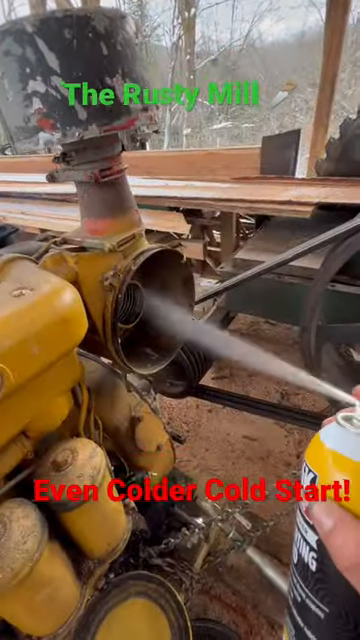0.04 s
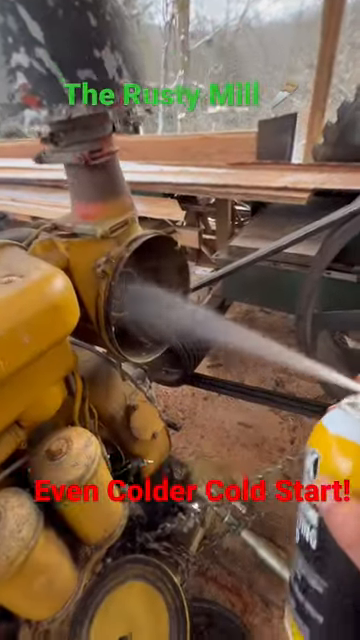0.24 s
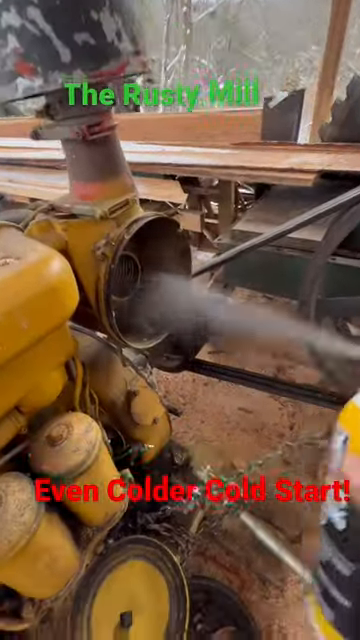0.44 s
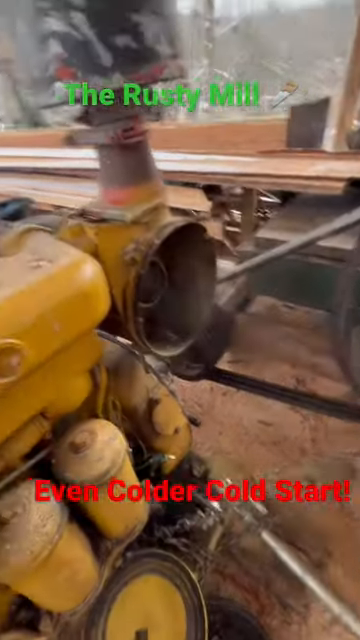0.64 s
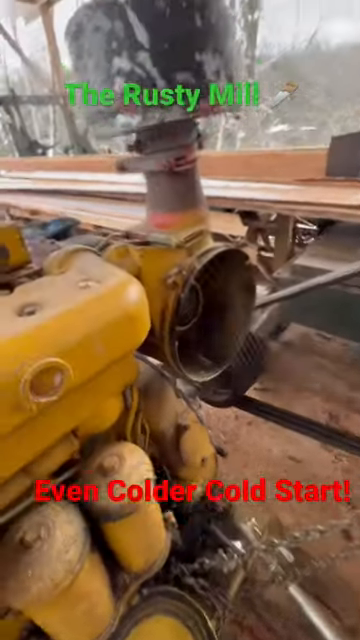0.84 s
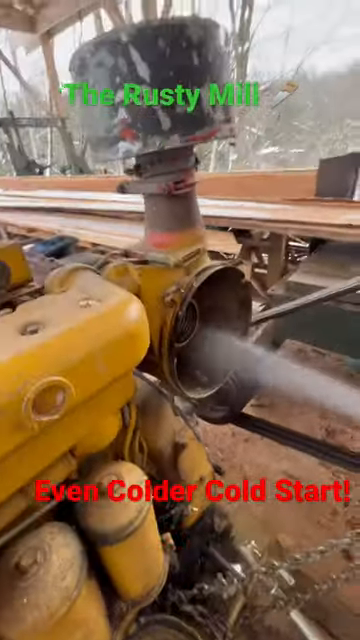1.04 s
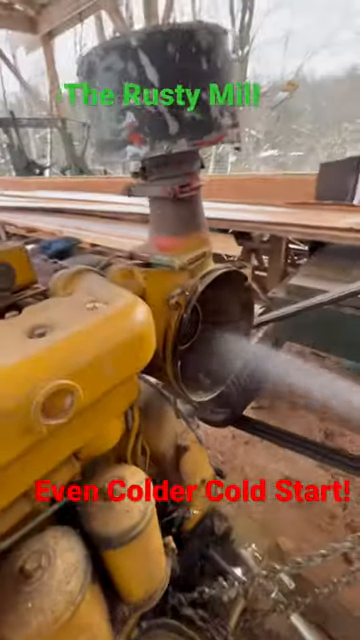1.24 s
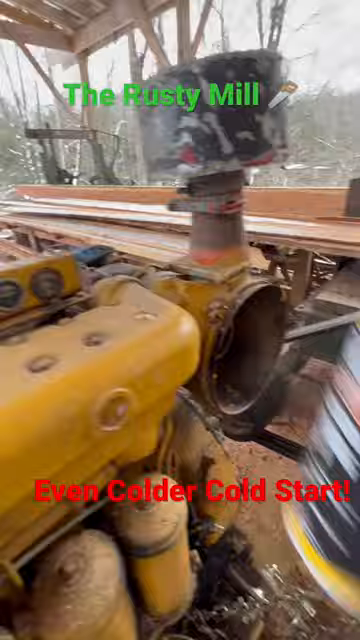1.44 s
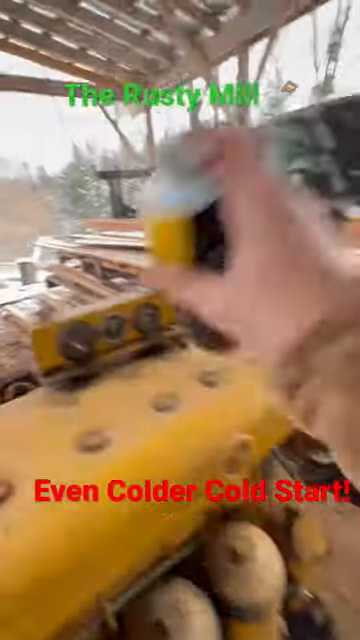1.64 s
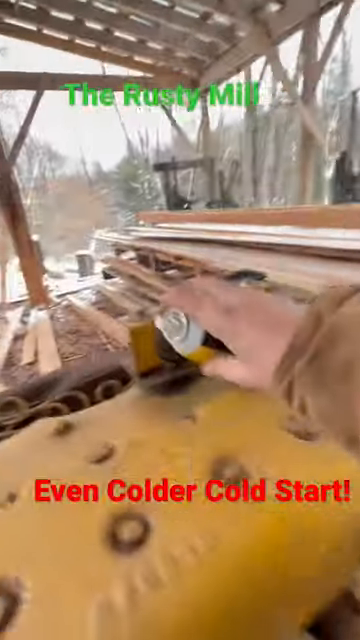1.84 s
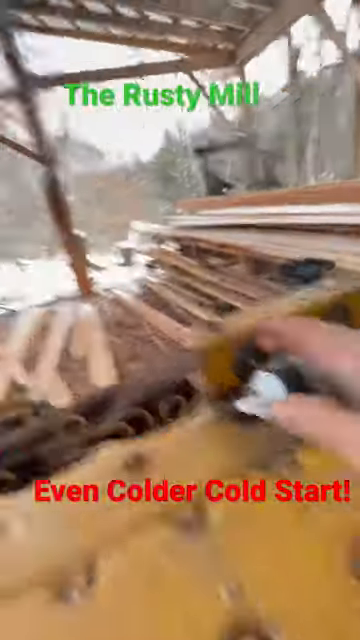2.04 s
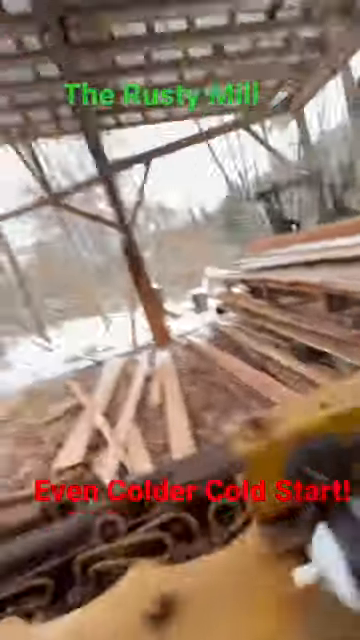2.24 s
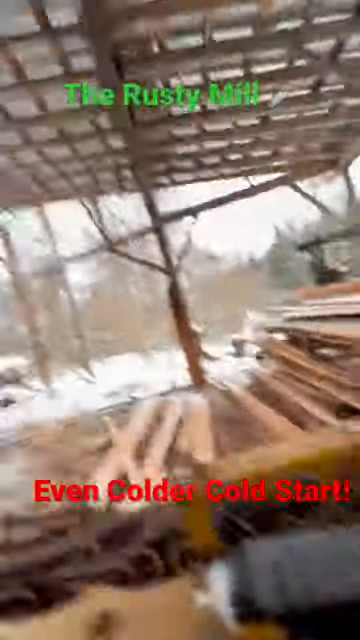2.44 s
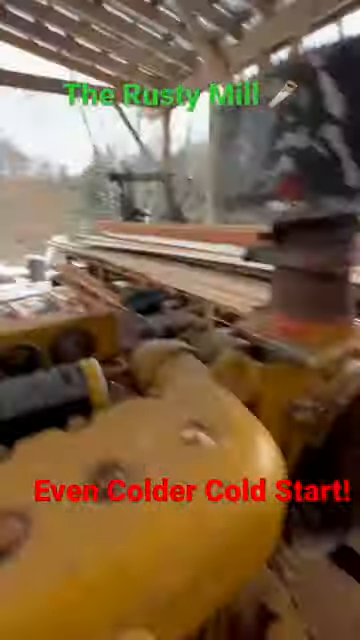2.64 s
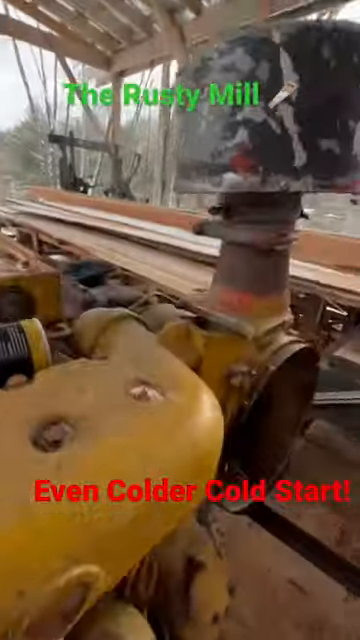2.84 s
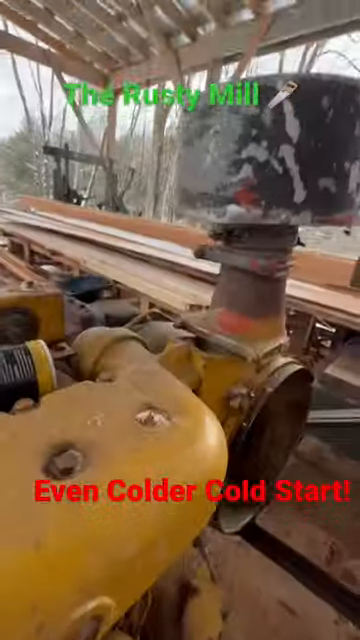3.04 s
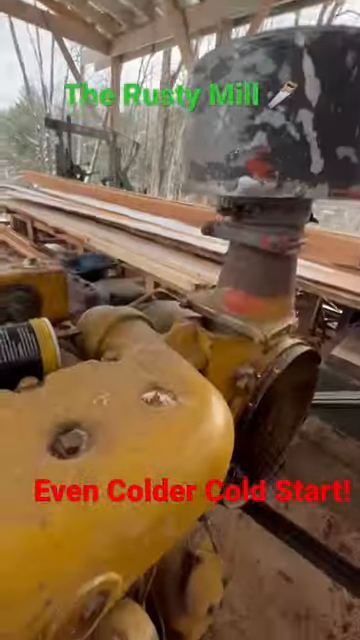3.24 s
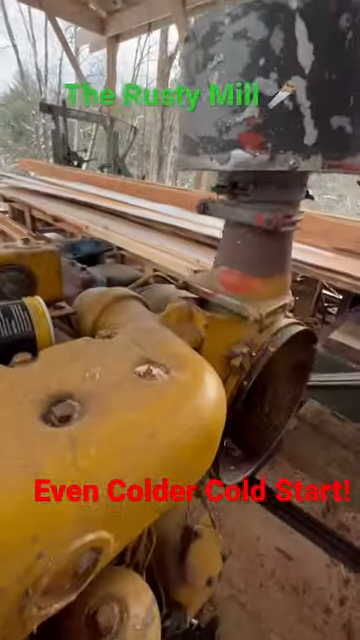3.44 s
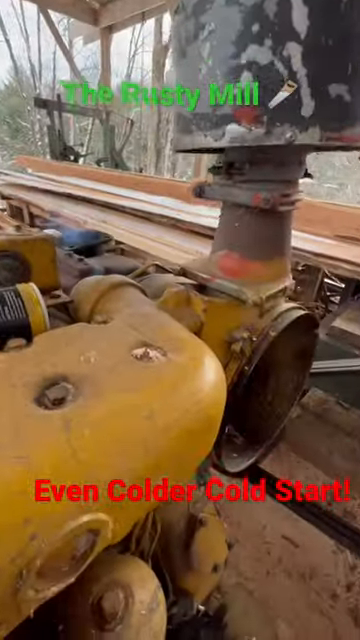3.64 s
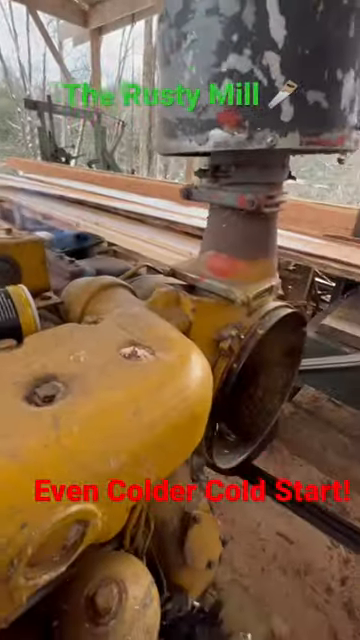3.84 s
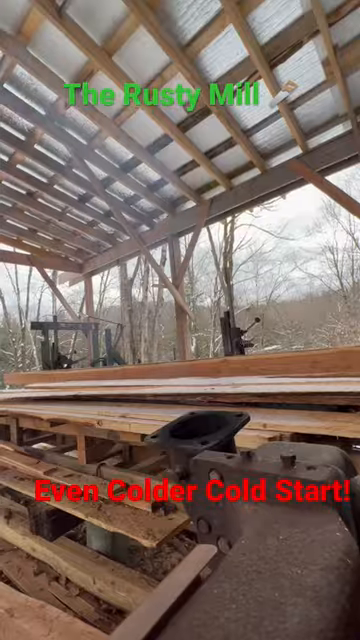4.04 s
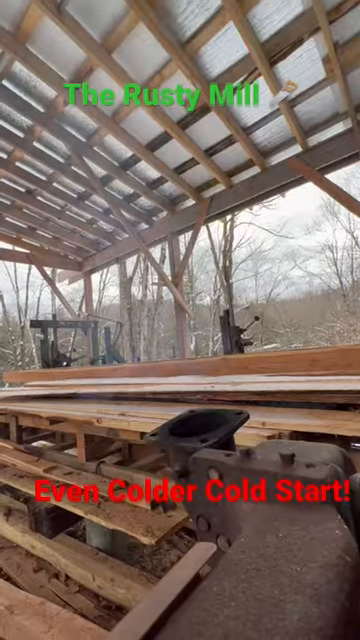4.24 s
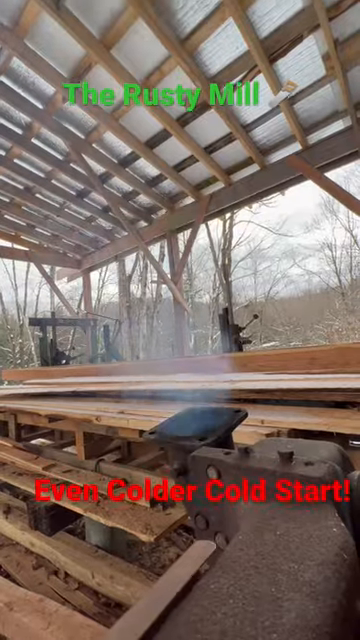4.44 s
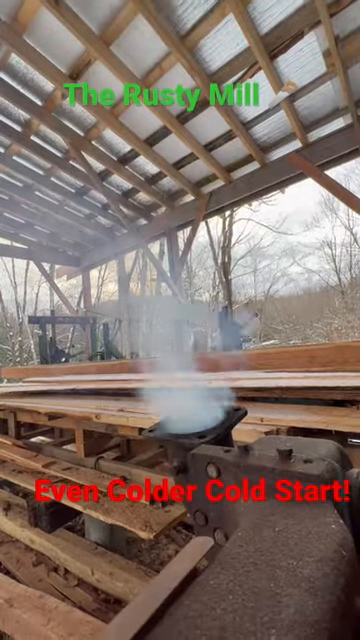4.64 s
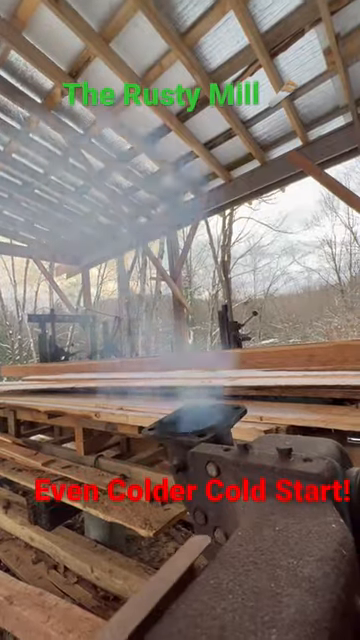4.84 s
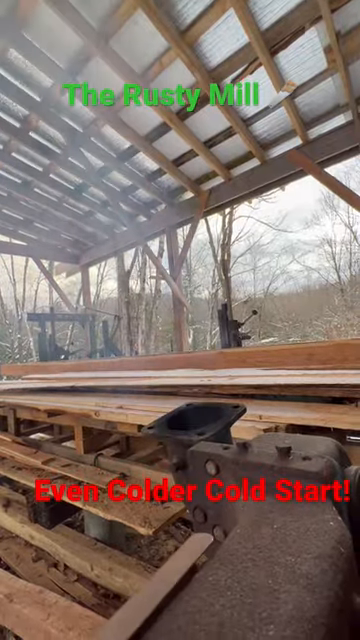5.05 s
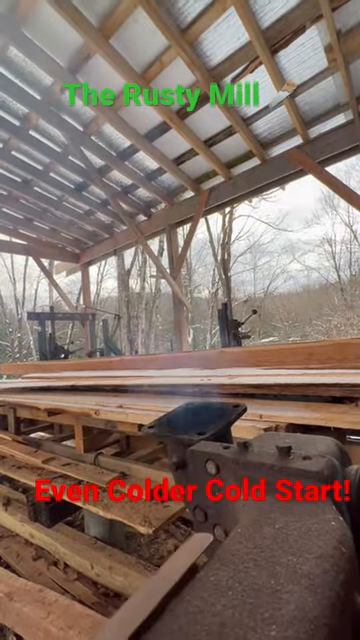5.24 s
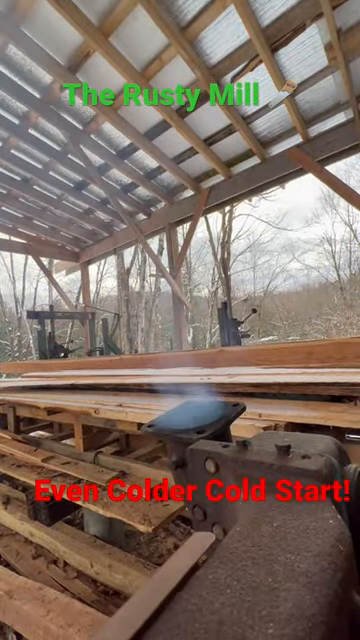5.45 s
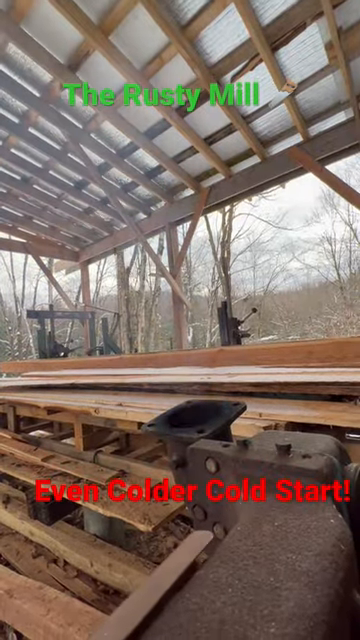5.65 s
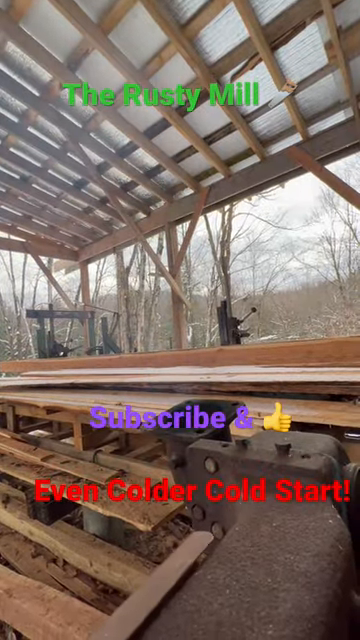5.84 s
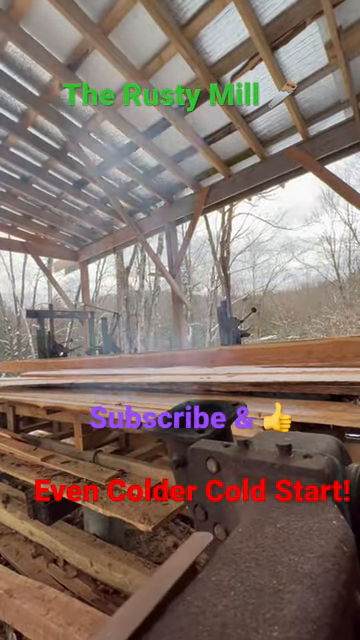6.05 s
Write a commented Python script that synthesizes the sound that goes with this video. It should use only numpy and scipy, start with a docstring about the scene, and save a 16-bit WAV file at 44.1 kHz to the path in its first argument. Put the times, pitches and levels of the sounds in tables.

```python
"""An open timber shed in the cold: an aerosol can hisses twice, drops on the engine cover and bounces.
The starter grinds on the flywheel, then a six-cylinder diesel chugs unevenly, one cylinder missing.
Jet, rustle and roar are shaped noise; the can and the metal parts are ringing modes; gas leaves in noisy puffs.
A phone with two microphone ports is held close by."""
import sys
import numpy as np
from scipy import signal
from scipy.fft import rfft, irfft, next_fast_len
from scipy.io import wavfile
from scipy.ndimage import map_coordinates

SR = 44100
rng = np.random.default_rng(int(sys.argv[2]) if len(sys.argv) > 2 else 0)


def wav_record(signal):
    """Record a signal, one row per channel, as 16-bit PCM in the file named by sys.argv[1]."""
    frames = np.transpose(np.atleast_2d(signal))
    bounded = np.clip(frames, -1, 1)
    # unit amplitude maps onto the largest positive 16-bit level
    quanta = np.round(bounded * 32767).astype(np.int16)
    wavfile.write(sys.argv[1], SR, quanta)


N = 269010
T = np.arange(N) / SR  # seconds

# In every colour table density_db is the relative level per Hz; noise() sets the overall level.
# Presses of the nozzle: start_s, stop_s, jet_db
NOZZLE_PRESSES = [(-.1, 0.403, -34.5), (0.799, 1.231, -35)]
# Colour of the spray jet: freq_hz, density_db
JET_COLOUR = [(290, -64), (500, -17.5), (621, -19), (893, -14.5), (1000, -9), (1080, -13), (2190, -7.5),
              (4870, -5.5), (5160, -2.5), (5710, -3.5), (7100, -1.5), (13800, -12), (16000, -16.5)]
OPEN_S, CLOSE_S = 0.0093, 0.0073  # the nozzle valve opening and closing
DRIBBLE_S, DRIBBLE_DB = .06, -17.5  # weak dribble after release, level against the jet

# Low stir of air: time_s, level_db
AIR_LEVEL = [(0.0, -54.5), (0.6, -63), (0.86, -60.5), (1.32, -55), (1.66, -60), (1.82, -52.5), (2.27, -49),
             (2.39, -46.5), (2.67, -54.5), (2.78, -62.5), (3.01, -63.5), (3.36, -60), (3.44, -70.5)]
# Colour of that stir: freq_hz, density_db
STIR_COLOUR = [(15, -39), (25, 8.5), (136, -1), (163, -6), (248, -4), (494, -14), (900, -24.5),
               (1170, -41.5), (1980, -120)]
# Colour of the far hiss: freq_hz, density_db
HISS_COLOUR = [(290, -51), (500, -10.5), (652, -8), (707, -8), (1070, -5), (1470, -7.5), (1870, -1.5),
               (2850, -18.5), (5190, -16), (12000, -28.5), (15600, -68.5), (22000, -120)]
# Sleeve, and the can scraping as it rolls: time_s, level_db
RUSTLE_LEVEL = [(.43, -69), (.55, -71), (.63, -66), (.69, -74), (.72, -110), (1.22, -62), (1.42, -67),
                (1.48, -58.5), (1.56, -67.5), (1.7, -68.5), (1.8, -54.5), (1.94, -43.5), (2.1, -41.5),
                (2.26, -45), (2.3, -38.5), (2.38, -51), (2.393, -62.5), (2.9, -71.5)]
# Colour of cloth and scrape: freq_hz, density_db
CLOTH_COLOUR = [(150, -59), (400, -9), (800, -6), (1570, -4), (2200, -11.5), (2800, -12.5), (8570, -19),
                (11000, -40.5), (15000, -60.5)]
# Soft bumps on the cover: start_s, level_db, pitch_hz (once settled), t60_s
SOFT_BUMPS = [(1.228, -53, 70, 0.15), (1.441, -41, 69, 0.14), (2.165, -23, 70, 0.18),
              (2.275, -22.5, 70, 0.084), (2.297, -20.5, 59.6, 0.2), (2.528, -36.5, 50.6, 0.23)]

# The can meets the cover: start_s, crack_db, clang_db, hum_db, ring_db, thud_db, wall_snap_hz
BOUNCES = [(1.7676, -11, -6.5, -50, -38, -39, 3040), (1.8658, -11.5, -2.5, -50.5, -31.5, -31.5, 2800),
           (1.8996, -17, -8.5, -37.5, -37, -47.5, 3220), (1.955, -9, -9, -23, -15.5, -21.5, 3380),
           (2.0484, -13, -3.5, -26, -29, -45.5, 4350), (2.0905, -22, -15.5, -33.5, -30, -36.5, 4400),
           (2.1055, -10, -6.5, -27, -22.5, -39, 4300), (2.1385, -29, -16, -21.5, -32.5, -30, 3380),
           (2.1605, -39.5, -21.5, -19.5, -40, -27.5, 3400), (2.1796, -21, -14, -39, -22.5, -25, 3360),
           (2.2424, -25, -16, -46, -33, -27.5, 3600), (2.2846, -27, -24, -51, -45, -27.5, 3360),
           (2.3098, -45.5, -19, -46, -53, -30, 3400)]
# Modes of the can, humming one first: pitch_hz, level_db, t60_s (before the cover damps the others)
CAN_MODES = [(785, 2.5, .8), (956, -6.5, 0.33), (1195, -6.5, 0.14), (1270, -19.5, 0.23), (1490, -8, 0.22),
             (1744, -13.5, 0.48), (2430, -12.5, 0.19), (2660, -17.5, 0.16), (3400, -16.5, 0.12),
             (3970, -7, 0.07), (4600, -13.5, 0.07), (4829, -31.5, .08), (6400, -15, 0.053)]
# Colour of the contact crack: freq_hz, density_db
CRACK_COLOUR = [(1060, -27.5), (1800, -5.5), (3030, -4), (3610, -23.5), (4790, -1.5), (5490, -9),
                (6130, -6), (8130, -7.5), (9080, -9.5), (16000, -40)]
# Colour of the clang: freq_hz, density_db
CLANG_COLOUR = [(240, -60.5), (400, -42.5), (629, 4), (791, 4), (1440, -1), (2060, -29), (2500, -27),
                (3250, -53.5), (5500, -120)]
SNAP_DB, CRACK_TAIL_DB = -4, -26  # against the crack
SHELL_T60 = 0.95  # s, extra damping of the shell on the cover
SLIDE_START_S, SLIDE_STOP_S = 2.29, 2.392  # the rim slides ever faster
SQUEAK_FROM_HZ, SQUEAK_TO_HZ, SQUEAK_END_DB = 1200, 2000, -37  # nominal glide and final level

# Starter, tones against the grind: time_s, tooth_rate_hz, grind_db, tooth_tone_db, octave_db
STARTER = [(3.425, 150, -65, -10, -15), (3.455, 160, -26, -20, -25), (3.485, 180, -10, -5, -25),
           (3.52, 170, -18, -14, -18), (3.555, 171, -15, 3, -22), (3.6, 225, -16, -16, -12),
           (3.66, 293, -12, -2, -25), (3.695, 286, -16, 0, -20), (3.725, 200, -13, -14, -25),
           (3.755, 194, -17, 6, -8), (3.78, 270, -14, -22, -18), (3.8, 308, -15, -12, 6),
           (3.825, 331, -15, -7, 2), (3.87, 299, -14, -11, -3), (3.9, 262, -19, -2, -12),
           (3.935, 352, -17, -25, 0), (3.955, 350, -18, -14, -2), (3.972, 312, -18, -5, 7),
           (3.99, 308, -15, -4, 4)]
# Resonances of the flywheel housing: freq_hz, width_hz, level_db
HOUSING_MODES = [(286, 85, -10), (603, 43.4, 1.5), (861, 32.4, 3), (1154, 20, -6), (1306, 29, -4.5),
                 (2050, 99, -17.5), (2160, 27, -36), (2560, 55, -14), (3000, 57, -19)]
# Colour of the loose grinding: freq_hz, density_db
GRIND_COLOUR = [(24, -64), (40, -16), (285, -4), (464, -16), (614, -9), (877, -11), (1040, -20),
                (1300, -19), (2590, -29.5), (3500, -31), (4550, -37), (7700, -120)]
# Colour of the motor whine and screech: freq_hz, density_db
WHINE_COLOUR = [(1470, -13), (2500, -9), (3010, -12), (3520, -21.5), (4910, -16.5), (5440, -10),
                (5870, -19), (7530, -16), (12100, -41), (12400, -34), (14700, -43), (15600, -47),
                (16000, -64.5)]
WHINE_DB, ENGAGE_S, SCREECH_DB = -32, 3.462, -7  # the pinion engages with a short screech
RELEASE_S = 3.995  # the starter stops

FIRST_S, CYCLE_S = 3.96, .2675  # first missed firing, length of one engine cycle
# Roar between firings: freq_hz, density_db
ROAR_COLOUR = [(15, -36), (25, -31), (64, 6), (190, -5.5), (326, 1), (451, -4.5), (714, -3.5), (796, -8),
               (1160, -9.5), (1290, 1.5), (1480, -19), (2410, -15.5), (3520, -26.5), (8360, -27),
               (16000, -76.5)]
# Exhaust thumps: share_of_cycle, level_db (before a random spread)
CYLINDERS = [(.19, -17.5), (0.35, -18.5), (.5, -25.5), (.66, -20), (0.842, -12.5)]
# Exhaust puffs: time_s, hiss_db, block_ring_db, bark_db, hiss_t60_s
PUFFS = [(4.0167, -12.5, -32, -23, 0.045), (4.0283, -15.5, -22, -31, 0.056),
         (4.0913, -16, -29, -20.5, 0.053), (4.13, -31, -25.5, -27, 0.045), (4.1444, -12, -26.5, -29, 0.041),
         (4.159, -16, -31, -27, 0.042), (4.2099, -21, -25, -21.5, 0.04), (4.2653, -25.5, -34, -28, 0.045),
         (4.2865, -16.5, -25, -27, 0.057), (4.3387, -15.5, -20, -25, 0.036),
         (4.401, -18, -21.5, -43, 0.036), (4.4218, -16, -37, -38, 0.051), (4.4828, -17, -20, -19, 0.036),
         (4.5361, -30.5, -25.5, -23.5, 0.033), (4.5737, -15, -25.5, -24, 0.04),
         (4.6342, -26.5, -54, -24, 0.045), (4.6469, -23.5, -53, -35, 0.045),
         (4.6796, -26.5, -26, -40, 0.031), (4.6919, -16.5, -31, -28.5, 0.066),
         (4.761, -28, -45, -43, 0.026), (4.783, -11, -27, -33, 0.034), (4.8263, -10, -30.5, -18, 0.034),
         (4.8494, -15.5, -19.5, -27, 0.042), (4.9138, -13.5, -26.5, -18, 0.045),
         (4.9455, -24, -30, -25, 0.04), (4.9612, -10.5, -40, -29, 0.039),
         (4.9789, -16.5, -24.5, -24, 0.045), (5.0351, -19, -26, -23, 0.057),
         (5.0914, -18.5, -27.5, -25, 0.045), (5.1124, -15.5, -32.5, -28.5, 0.045),
         (5.1707, -22.5, -28, -41, 0.028), (5.1799, -17, -39, -24, 0.025), (5.2179, -14, -20.5, -27, 0.039),
         (5.252, -12, -30, -21.5, 0.027), (5.3155, -17, -33.5, -30, 0.039), (5.3559, -14, -28, -20, 0.038),
         (5.3822, -17, -20, -21, 0.045), (5.4332, -22, -33, -34, 0.045), (5.4463, -14.5, -28, -19, 0.045),
         (5.4896, -7, -29, -22, 0.04), (5.5155, -12.5, -20.5, -19, 0.04),
         (5.6177, -14.5, -19, -24.5, 0.045), (5.622, -11, -31, -16, 0.067),
         (5.6839, -17.5, -26, -29, 0.074), (5.7545, -8, -31, -22.5, 0.045),
         (5.7828, -13.5, -22, -20.5, 0.037), (5.8299, -19, -20.5, -19.5, 0.045),
         (5.892, -8.5, -29.5, -14.5, 0.04), (5.925, -14.5, -21, -22.5, 0.037),
         (5.9794, -4, -22, -15, 0.038), (6.0179, -12, -39, -23, 0.057), (6.0604, -16.5, -27.5, -26, 0.045)]
# Colour of the puff hiss: freq_hz, density_db
PUFF_COLOUR = [(880, -57), (1500, -2), (1670, -9.5), (2460, 0.5), (3220, -5), (4200, -19), (4690, -2),
               (5940, -14), (8240, -9.5), (11100, -23.5), (12700, -34.5), (15100, -27), (16000, -32)]
# Colour of the bright edge on a puff: freq_hz, density_db
EDGE_COLOUR = [(5000, -60), (9000, -3), (12000, -3.5), (16000, -1)]
# Colour of the bark: freq_hz, density_db
BARK_COLOUR = [(71, -49), (120, 5.5), (172, 1), (322, 2), (447, -12), (711, -3.5), (820, -33), (900, -14),
               (1170, -36), (1980, -120)]
# Resonances of the engine block: freq_hz, width_hz, level_db
BLOCK_MODES = [(730, 15, -2.5), (990, 170, -3.5), (1281, 35, 4), (1708, 27, -7), (2430, 94, -16),
               (4590, 150, -20.5)]
EDGE_DB, EDGE_GROWS = -5, 1.92  # harder puffs are brighter: offset, dB of edge per dB of hiss
KNOCK_GAIN_DB, BARK_GAIN_DB = 25.5, 7  # noise drive over the ring and over the pressure front
VALVE_SHARE, VALVE_DB = .52, -16.5  # a valve pings once a cycle: share of cycle, level

TOP_HZ = 16000  # upper band limit of the phone
PHASE_CAP_HZ = 5690  # phase offset between left and right stays constant above this


def amp(db):
    """Decibels to linear gain."""
    return 10 ** (np.asarray(db) / 20)


def unit(x):
    """Scale to rms 1."""
    return x / np.sqrt(np.mean(x ** 2) + 1e-20)


def ramp(start, stop):
    """0 before start, 1 after stop."""
    return np.clip((T - start) / (stop - start), 0, 1)


def level_curve(rows):
    """Level in dB at every sample, near silence outside the table."""
    times, db = np.transpose(rows)
    return np.interp(T, times, db, -120, -120)


def filtered(x, response):
    """Shape x by a complex response of frequency."""
    m = next_fast_len(N + 8192)
    return irfft(rfft(x, m) * response(np.fft.rfftfreq(m, 1 / SR)), m)[..., :N]


def noise(colour):
    """Noise of rms 1 with the given colour, interpolated along log frequency."""
    f, db = np.transpose(colour)
    white = rng.standard_normal(N)
    return unit(filtered(white, lambda hz: amp(np.interp(np.log(hz + 1), np.log(f), db))))


def modes(table):
    """Causal response of a resonant body, its modes alternating in sign."""
    def response(f):
        return sum((-1) ** k * amp(db) * 1j * f * width / (centre ** 2 - f * f + 1j * f * width)
                   for k, (centre, width, db) in enumerate(table))
    return response


def wobble(rate):
    """A smooth random curve with rate knots a second."""
    knots = rng.standard_normal(int(N * rate / SR) + 4)
    return map_coordinates(knots, [T * rate])


def bursts(times, db, t60, attack):
    """Sum of envelopes that rise quickly and die away, each held for a quarter second."""
    out, t = np.zeros(N + SR), np.arange(SR // 4) / SR
    for start, level, life in np.broadcast(times, db, t60):
        envelope = amp(level - 60 * t / life) * (1 - np.exp(-t / attack))
        out[round(start * SR):][:len(t)] += envelope
    return out[:N]


def thump(start, db, hz, t60, drop):
    """A decaying push whose pitch starts high by about the share drop and settles on hz."""
    out, t = np.zeros(N + SR), np.arange(SR // 4) / SR
    bent_time = t + drop * 0.0053 * (1 - np.exp(-t / 0.0055))
    out[round(start * SR):][:len(t)] = amp(db - 60 * t / t60) * np.sin(2 * np.pi * hz * bent_time)
    return out[:N]


def ports(x, lag, left_db, wet_db):
    """Left port hears late by lag seconds; diffuse scatter differs by port, redrawn for every short piece."""
    hop = 1536
    steps, t = N // hop + 2, np.arange(hop) / SR
    padded = np.pad(x, (hop, 3 * hop))
    windows = np.lib.stride_tricks.sliding_window_view(padded, 2 * hop)[::hop][:steps]
    pieces = windows * np.hanning(2 * hop)
    # a fresh decaying noise tail for every piece and port
    tails = rng.standard_normal((2, steps, hop)) * amp(-60 * t / 0.046)
    tails /= np.linalg.norm(tails, axis=2, keepdims=True)
    heard = signal.fftconvolve(pieces[None], tails, axes=2)
    wet = np.zeros((2, (steps + 3) * hop))
    for k in range(steps):
        wet[:, k * hop:k * hop + heard.shape[2]] += heard[:, k]
    # the scatter gains treble
    wet = filtered(wet[:, hop:hop + N],
                   lambda f: 0.3 + .8j * f / (500 + 1j * f) + .7 * (f / TOP_HZ) ** .5)
    # half the lag goes to each port, in opposite directions
    side = np.array([[1], [-1]])
    direct = filtered(x, lambda f: np.exp(-1j * np.pi * np.minimum(f, PHASE_CAP_HZ) * lag * side))
    return (direct + amp(wet_db) * wet) * amp([[left_db / 2], [-left_db / 2]])


def spray():
    """Turbulent jet: coloured noise gated by the nozzle, sputtering a little."""
    level = np.zeros(N)
    for start, stop, db in NOZZLE_PRESSES:
        jet = 1 - ramp(stop, stop + CLOSE_S)
        dribble = amp(DRIBBLE_DB) * (1 - ramp(stop, stop + DRIBBLE_S))
        level += amp(db) * ramp(start, start + OPEN_S) * (jet + dribble)
    return level * amp(0.2 * wobble(43)) * noise(JET_COLOUR)


def air():
    """Low stir of air over a faint far hiss, both wavering noise."""
    stir = amp(level_curve(AIR_LEVEL) + 3.7 * wobble(24.94)) * noise(STIR_COLOUR)
    far_hiss = amp(-70.5 + 0.91 * wobble(13)) * noise(HISS_COLOUR)
    return stir + far_hiss


def rustle():
    """Friction of sleeve and rolling can: noise with a quick flutter in level."""
    return amp(level_curve(RUSTLE_LEVEL) + 1.1 * wobble(70)) * noise(CLOTH_COLOUR)


def soft_bumps():
    """Soft bumps on the cover: low pushes that fall in pitch."""
    return sum(thump(start, db, hz, t60, drop=1.7) for start, db, hz, t60 in SOFT_BUMPS)


def can():
    """Contacts crack, snap, clang and thud; the shell rings, wavering as it rolls, until the next contact."""
    start_s, crack_db, clang_db, hum_db, ring_db, thud_db, snap_hz = np.transpose(BOUNCES)
    crack = bursts(start_s, crack_db, 0.012, attack=0.00028)
    crack += bursts(start_s, crack_db + CRACK_TAIL_DB, 0.084, attack=0.00063)
    hits = crack * noise(CRACK_COLOUR)
    hits += bursts(start_s, clang_db, 0.015, attack=0.00035) * noise(CLANG_COLOUR)
    for start, db, hz in zip(start_s, crack_db, snap_hz):
        hits += thump(start, db + SNAP_DB, hz, 0.018, drop=0)

    rings = np.zeros(N)
    rolling_time = T + 0.00007 * wobble(60)  # its unevenness wavers the pitch
    stop_s = np.append(start_s[1:], start_s[-1] + .07)
    for start, stop, hum, ring, thud in zip(start_s, stop_s, hum_db, ring_db, thud_db):
        span = slice(round(start * SR), round((stop + 0.0055) * SR))
        t = T[span] - start
        shell = [amp(db - 60 * t / t60) * np.sin(2 * np.pi * hz * rolling_time[span])
                 for hz, db, t60 in CAN_MODES]
        # each contact excites the upper modes in a different balance
        balance = amp(ring + rng.normal(0, 3, len(CAN_MODES) - 1))
        tone = amp(hum) * shell[0] + balance @ shell[1:] * amp(-60 * t / SHELL_T60)
        fade = np.clip(np.minimum(t, t[-1] - t) / 0.0018, 0, 1)
        rings[span] += tone * fade
        hits += thump(start, thud, 90, 0.032, drop=3.3)
    return hits, rings


def squeak():
    """The sliding rim squeaks: a jittery rising tone that swells and stops."""
    slide = ramp(SLIDE_START_S, SLIDE_STOP_S)
    hz = SQUEAK_FROM_HZ * (SQUEAK_TO_HZ / SQUEAK_FROM_HZ) ** slide * (1 + 0.12 * wobble(700))
    level = amp(SQUEAK_END_DB + 2.4 * wobble(150)) * slide ** .3 * (T < SLIDE_STOP_S)
    return level * np.sin(2 * np.pi * np.cumsum(hz) / SR)


def starter():
    """The pinion clunks in; gear teeth strike at an uneven, surging rate and shake the housing."""
    time_s, *columns = np.transpose(STARTER)
    hz, grind_db, tone_db, octave_db = (np.interp(T, time_s, c) for c in columns)
    on = (T > time_s[0]) * (1 - ramp(RELEASE_S - .004, RELEASE_S))
    on_rms = np.sqrt(np.mean(on))
    turn = np.cumsum(hz * (1 + .015 * wobble(120))) / SR
    slop = .07 * wobble(300)  # play between the teeth, in tooth spacings
    passed = np.maximum(np.diff(np.floor(turn + slop), prepend=0), 0)
    teeth = passed * amp(4.8 * rng.standard_normal(N))
    drive = (unit(teeth) + .8 * rng.standard_normal(N)) * on
    struck = unit(filtered(drive, modes(HOUSING_MODES)))
    grind = unit(struck + 0.46 * noise(GRIND_COLOUR) * on / on_rms) * on_rms
    tone = amp(grind_db + tone_db + 0.78 * wobble(60)) * np.sqrt(2) * np.sin(2 * np.pi * turn)
    tone += amp(grind_db + octave_db + 1.45 * wobble(60)) * np.sqrt(2) * np.sin(4 * np.pi * turn)
    clunk = thump(3.468, -8.5, 96.8, 0.13, drop=2.24)
    whine = amp(WHINE_DB + 2.0 * wobble(70)) * ramp(3.43, ENGAGE_S)
    whine += bursts([ENGAGE_S], SCREECH_DB, 0.038, attack=0.0025)
    return clunk + on * (tone + amp(grind_db + 0.86 * wobble(50)) * grind + whine * noise(WHINE_COLOUR))


def roar():
    """Roar between firings: wavering noise once the starter stops."""
    return amp(-28 + 2.9 * wobble(35)) * noise(ROAR_COLOUR) * (T > RELEASE_S)


def cylinder_thumps():
    """Five low thumps and a gap per engine cycle, each of slightly different strength."""
    out = np.zeros(N)
    for start in np.arange(FIRST_S, N / SR, CYCLE_S):
        for share, db in CYLINDERS:
            at = start - .014 + share * CYCLE_S
            out += thump(at, db + rng.standard_normal(), 66, 0.073, drop=0.019)
    return out


def fine_crackle():
    """Fine random crackle within the engine noise: very short bursts of bright noise."""
    start_s, db = rng.uniform([4, -10], [6.09, 0], (360, 2)).T
    return amp(-26.5) * bursts(start_s, db, 0.011, attack=.0004) * noise(PUFF_COLOUR)


def exhaust_puffs():
    """Gas leaves in hissing, barking puffs, each with a pressure front and a knock that rings the block."""
    s, hiss_db, ring_db, bark_db, t60 = np.transpose(PUFFS)
    flutter = amp(2.5 * wobble(300))  # gas leaves in ragged lumps
    out = bursts(s - .002, hiss_db, t60, attack=0.0054) * flutter * noise(PUFF_COLOUR)
    edge_db = EDGE_DB + EDGE_GROWS * hiss_db
    out += bursts(s - .002, edge_db, 0.025, attack=0.004) * flutter * noise(EDGE_COLOUR)
    out += bursts(s - .004, bark_db + BARK_GAIN_DB, 0.083, attack=0.0082) * noise(BARK_COLOUR)
    for at, db, hz in zip(s, bark_db, rng.uniform(236, 283, len(s))):  # pressure front
        out += thump(at - .003, db, hz, 0.078, drop=0.2)
    knocks = bursts(s - .002, ring_db + KNOCK_GAIN_DB, 0.074, attack=0.00124) * rng.standard_normal(N)
    out += filtered(knocks, modes(BLOCK_MODES))
    for at, db, hz in zip(s, ring_db, rng.normal(1290, 20, len(s))):  # the strongest block mode sings on
        out += thump(at - .003, db, hz, .1, drop=0)
    return out


def valve():
    """Short rings of one stiff part, swelling over a few milliseconds, once a cycle."""
    s = np.arange(FIRST_S + VALVE_SHARE * CYCLE_S, N / SR, CYCLE_S)
    return bursts(s, VALVE_DB, 0.062, attack=0.002) * np.sin(2 * np.pi * 958 * T)


def scene():
    """Place every source between the two ports and mix."""
    jet = ports(spray(), lag=.00052, left_db=-1.1, wet_db=-4)
    surroundings = ports(air() + rustle() + soft_bumps() + squeak(), lag=.0001, left_db=-0.5, wet_db=3.5)
    hits, rings = can()
    near_right = ports(hits, lag=0.000692, left_db=-2.0, wet_db=-3.0)
    near_right += ports(rings, lag=0.00073, left_db=-11.5, wet_db=-17.5)
    machinery = ports(starter() + valve(), lag=-0.000037, left_db=-0.9, wet_db=-4)
    diesel = roar() + cylinder_thumps() + fine_crackle() + exhaust_puffs()
    exhaust = ports(diesel, lag=.0005, left_db=-1.2, wet_db=-3)
    return jet + surroundings + near_right + machinery + exhaust


def record(dry):
    """The phone cuts deep bass, rounds off the highest peaks and keeps nothing above its band limit."""
    x = filtered(dry, lambda hz: (1j * hz / (35 + 1j * hz)) ** 2)
    x = x / (1 + np.abs(x / .95) ** 5) ** (1 / 5)
    return filtered(x, lambda hz: hz < TOP_HZ)


dry = scene()
out = record(dry)
wav_record(out)
```